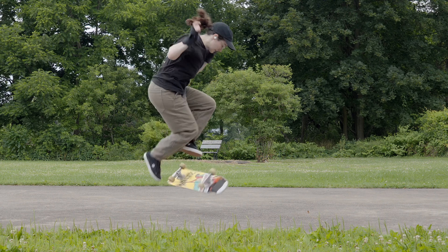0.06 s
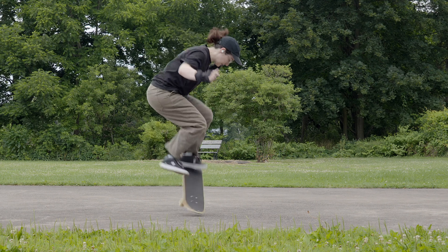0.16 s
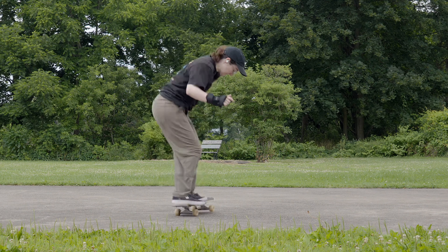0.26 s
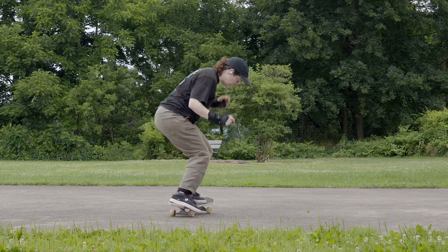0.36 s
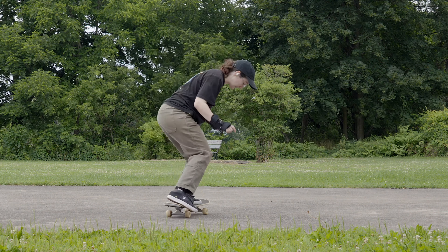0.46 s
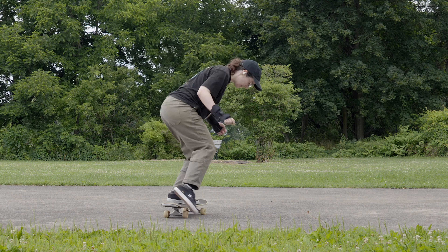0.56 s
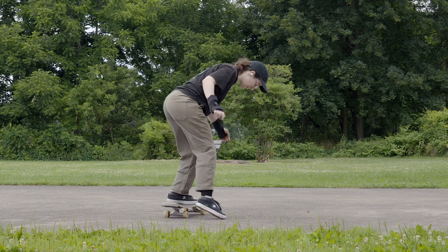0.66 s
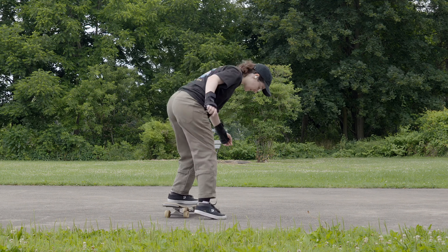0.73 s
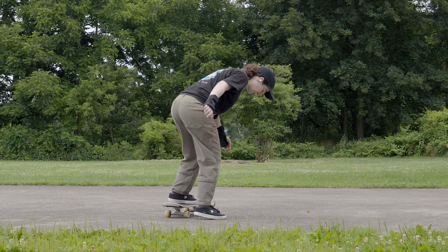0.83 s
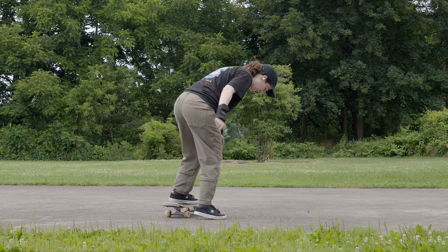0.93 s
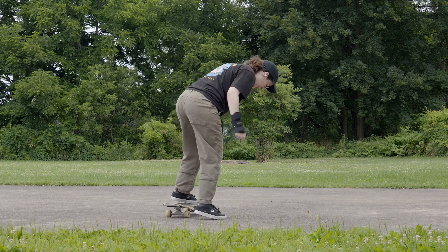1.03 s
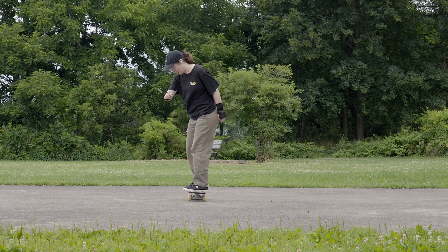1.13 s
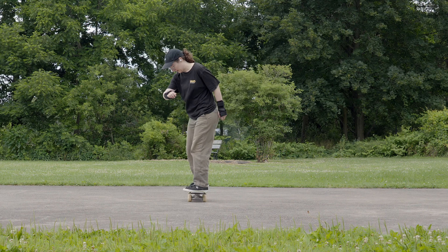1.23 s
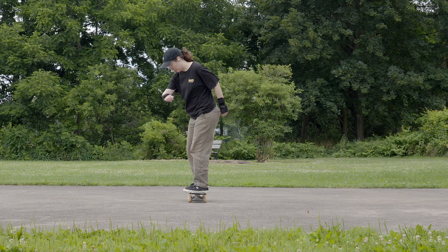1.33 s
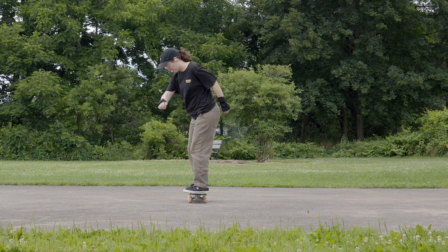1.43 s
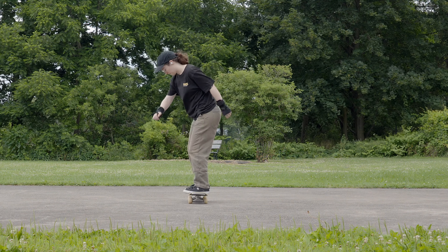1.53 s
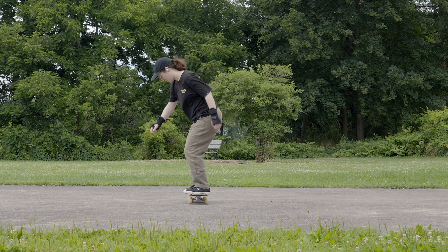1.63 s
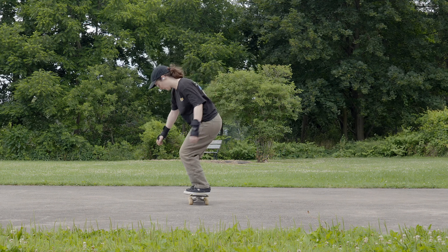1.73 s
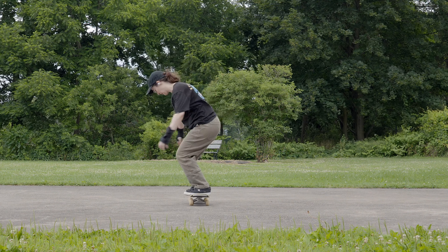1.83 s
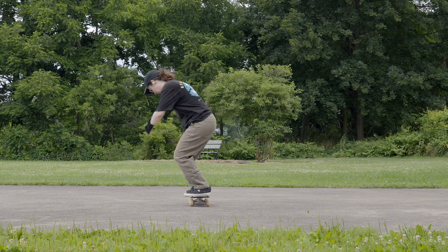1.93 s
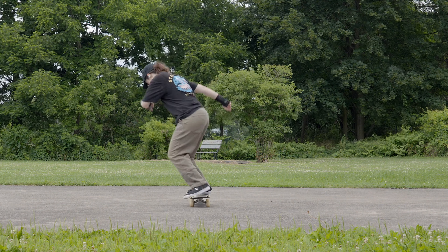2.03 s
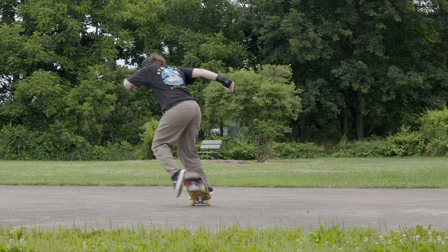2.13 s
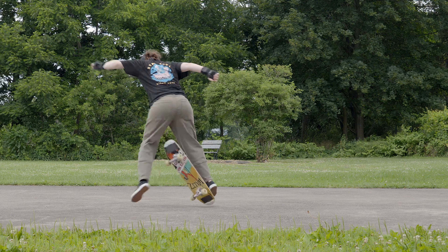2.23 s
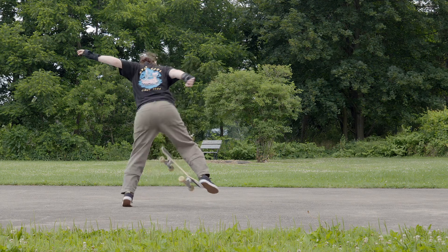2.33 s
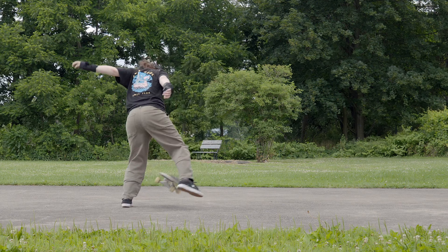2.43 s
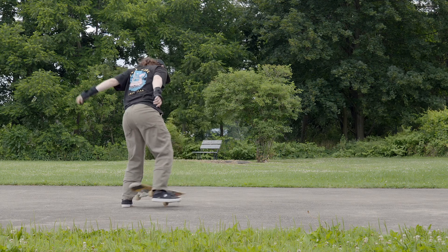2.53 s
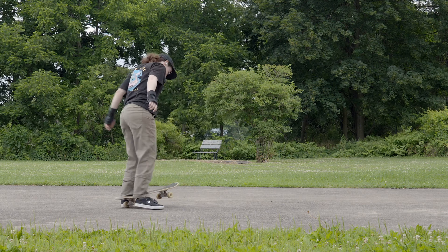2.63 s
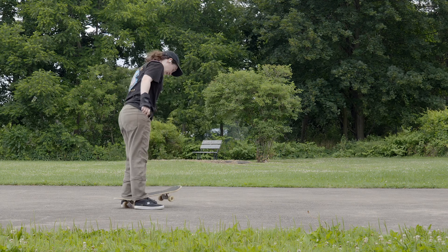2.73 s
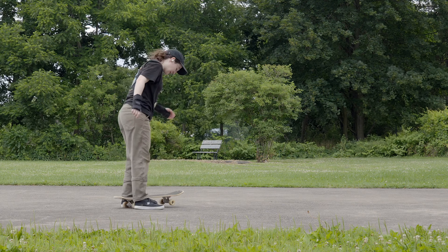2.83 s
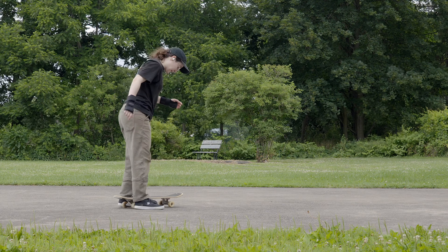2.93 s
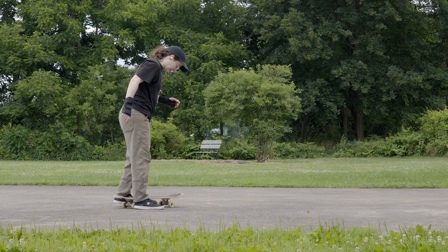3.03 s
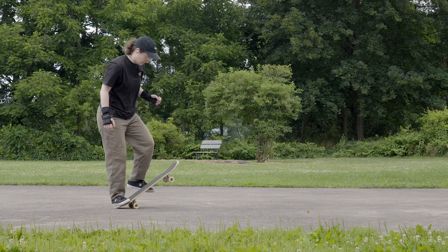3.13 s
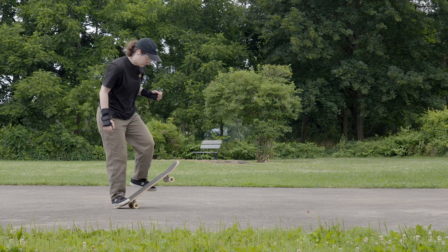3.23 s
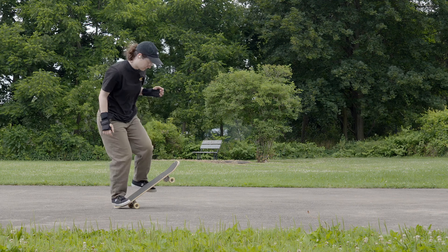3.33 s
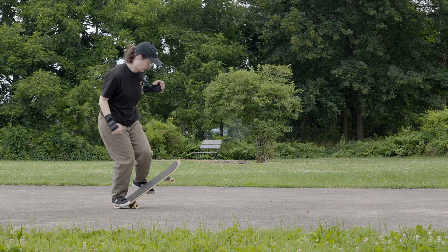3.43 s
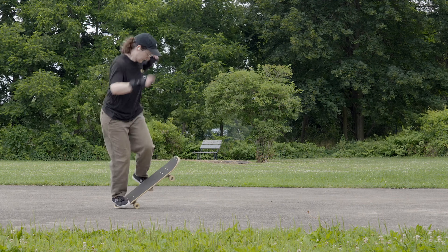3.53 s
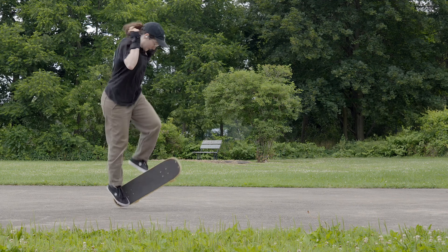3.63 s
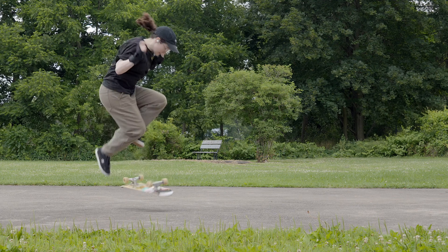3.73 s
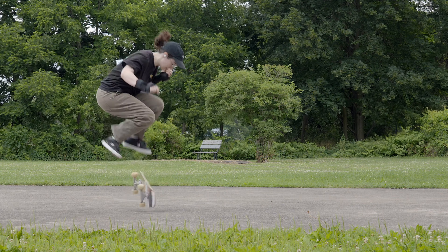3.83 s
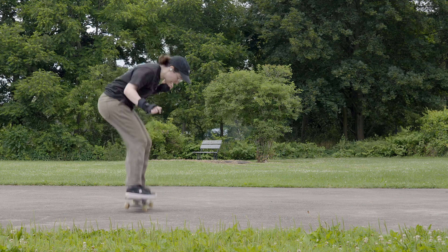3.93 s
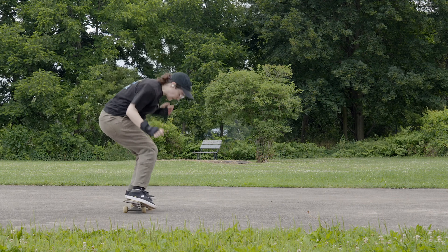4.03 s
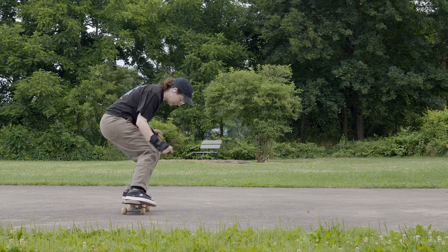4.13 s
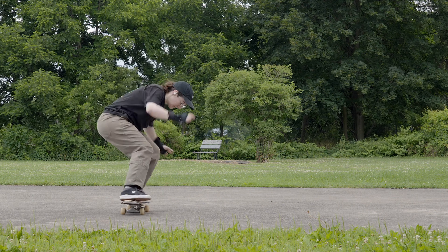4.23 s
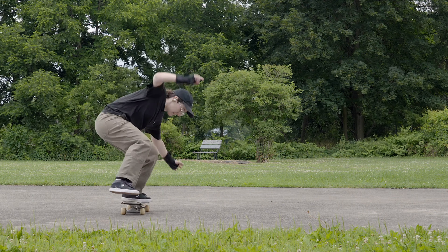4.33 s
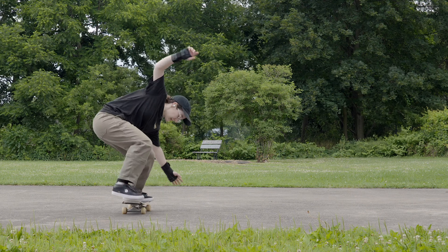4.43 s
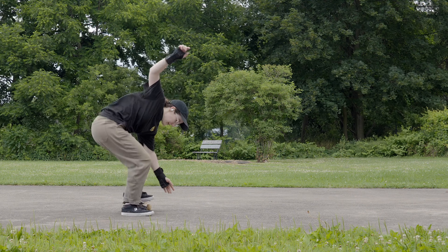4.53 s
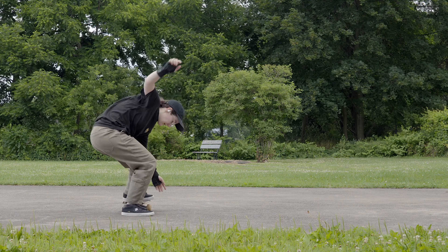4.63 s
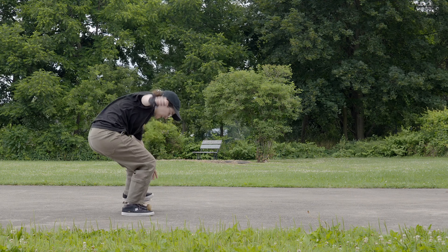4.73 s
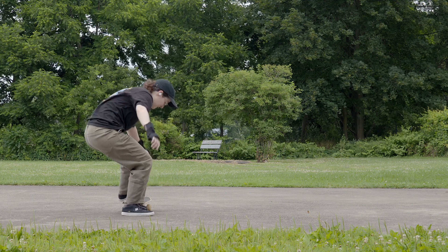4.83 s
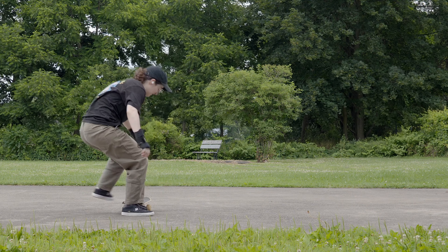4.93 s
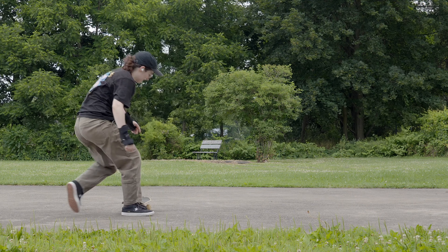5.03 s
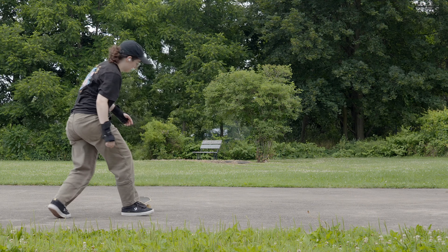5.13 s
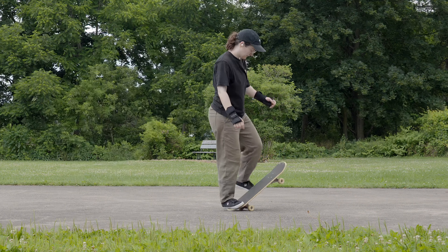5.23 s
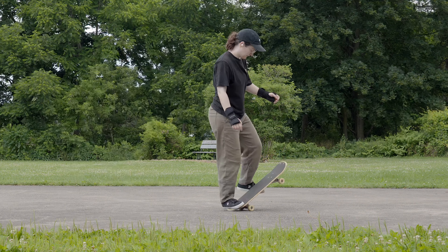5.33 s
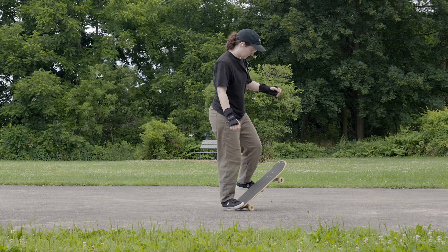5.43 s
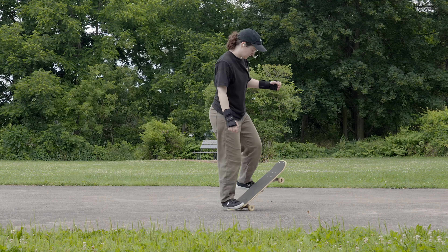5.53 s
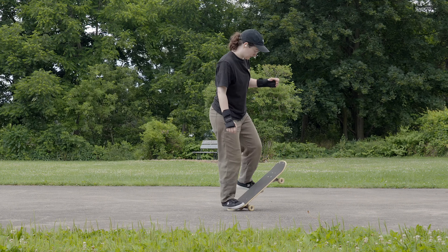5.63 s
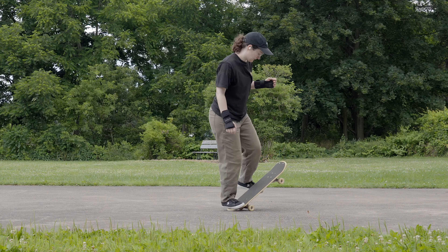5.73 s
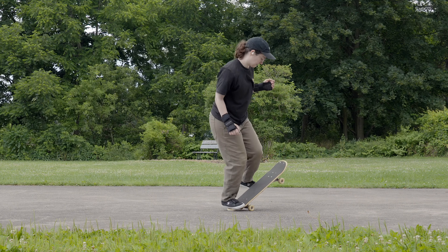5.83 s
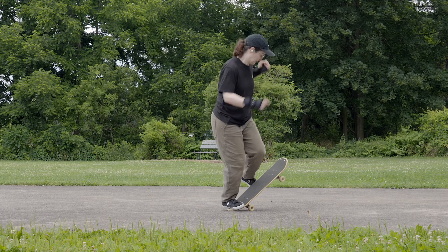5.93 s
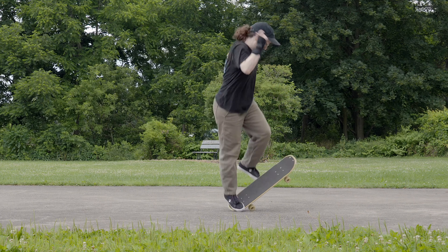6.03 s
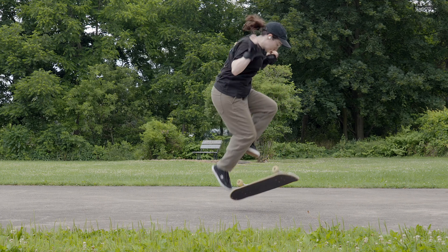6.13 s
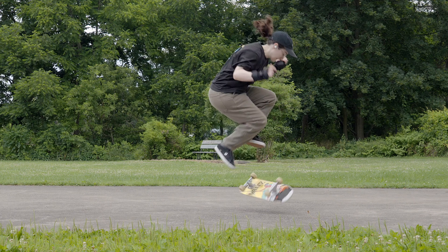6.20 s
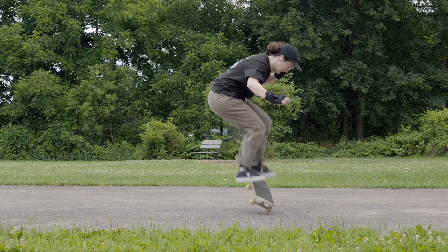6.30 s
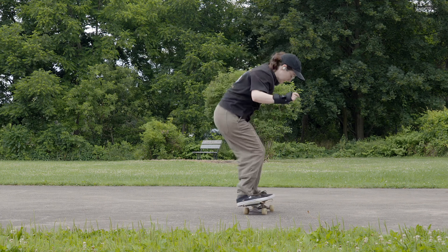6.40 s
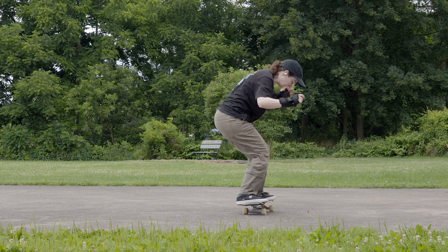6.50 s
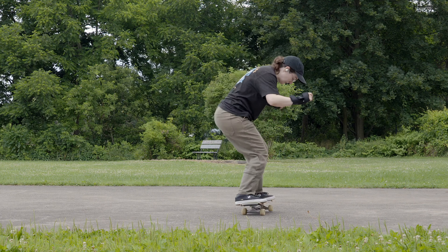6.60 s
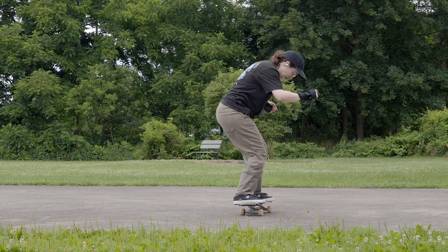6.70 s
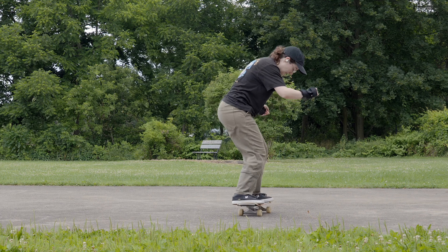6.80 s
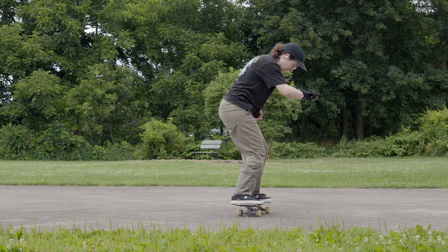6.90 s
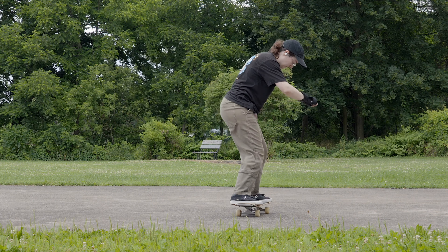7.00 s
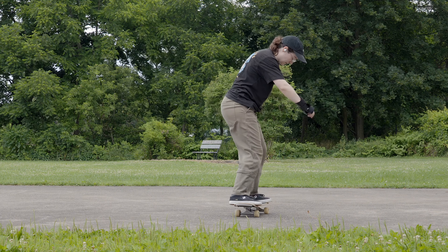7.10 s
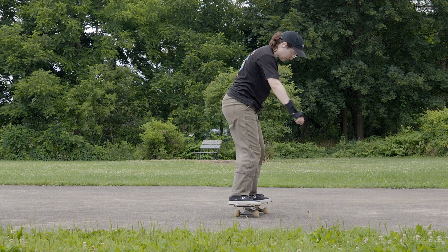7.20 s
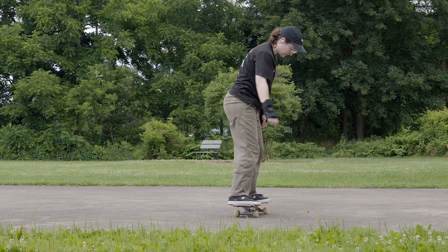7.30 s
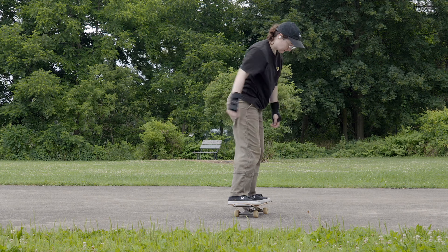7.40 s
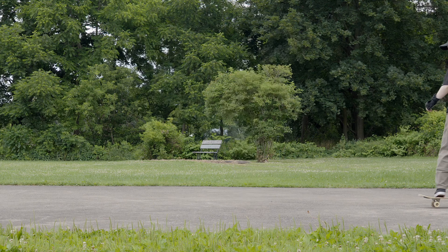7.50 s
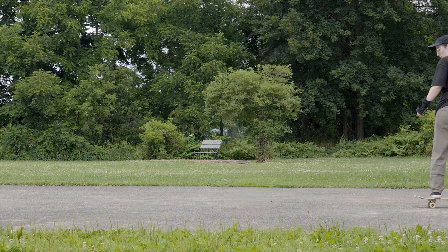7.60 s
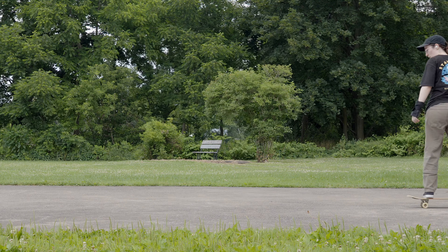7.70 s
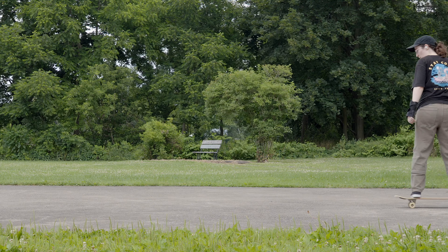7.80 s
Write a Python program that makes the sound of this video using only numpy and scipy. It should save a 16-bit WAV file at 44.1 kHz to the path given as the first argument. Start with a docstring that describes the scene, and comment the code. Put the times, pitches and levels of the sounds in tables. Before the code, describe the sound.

A skateboard is heard from some metres away on an asphalt park path. A light tap at the very start leads to a sharp clatter of deck and wheels around 0.3 seconds, then a short gritty roll that eases to a quiet coast. The board cracks again at 2.3 seconds, with looser knocks, soft shoe thuds and brief rolling between 2.6 and 3 seconds. A light pop at 3.7 seconds is followed by a loud clattering landing from 3.9 to 4.1 and a smaller knock at 4.6. After a lull, a sharp crack near 6.3 seconds runs into another hard landing at 6.5, with a low thud and a short roll. Two faint taps come around 7.6 seconds. Each knock echoes softly off the trees. Throughout, leaves hiss faintly over a dark wash of far traffic, while low engine drones come and go.

```python
"""Skateboard flip tricks in a park.

Some metres away the tail pops, then wheels, deck and shoes clatter onto an asphalt path.
Each blow rings the board, soles thud, and the wheels roll over the grain of the asphalt.
A wall of trees scatters each knock back as a soft echo.
Behind it leaves hiss, far traffic washes and distant engines drone."""
import sys
import numpy as np
from scipy import signal
from scipy.fft import rfft, irfft, next_fast_len
from scipy.io import wavfile

SR = 44100
rng = np.random.default_rng(int(sys.argv[2]) if len(sys.argv) > 2 else 0)


def to_wav(s):
    """Save 16-bit WAV."""
    ch = np.atleast_2d(s).T  # columns
    pcm = np.round(np.clip(ch, -1, 1) * 32767)  # PCM
    wavfile.write(sys.argv[1], SR, pcm.astype(np.int16))


N = 346626

# the four registers of a hit, thump, knock, crack and grit, lie between these: (edge [Hz])
REGISTER_EDGES = [205, 550, 1400, 3100, 16000]
# tone shared by all hits, thump to grit: (relative level [dB])
REGISTER_TONE = [0, 2, -0.5, -10.5]
# hits of tail, wheels and shoes: (time [s], clatter decay [s], level [dB],
# hardness [dB per register], struck spot's pitch [Hz], spot over the level [dB])
HITS = [(0.027, .015, -44.5, -1, 780, -8.5), (0.2456, 0.014, -32.5, 1.8, 590, -26),
        (0.2764, 0.0033, -38.5, -3.5, 1100, 5), (0.3029, 0.01, -29.5, -0.1, 255, -7.5),
        (0.3388, .0022, -26, 0, 880, 3.5), (0.348, 0.0044, -30, 5.5, 414, 8.5),
        (0.3521, 0.0044, -22, -2, 424, -5), (0.363, 0.0076, -29, 5, 1680, -4),
        (0.507, 0.0067, -42.5, 0.8, 410, -7), (2.2643, 0.0022, -34.5, -4.5, 2380, 10.5),
        (2.269, 0.0032, -34.5, 1, 1150, 2), (2.292, 0.0097, -34.5, 1.7, 633, 1),
        (2.5918, 0.012, -32, 0, 487, -16), (2.622, 0.0083, -35.5, 0.7, 287, -11),
        (2.6863, 0.0033, -33.5, 1, 1570, -6.5), (2.902, 0.0079, -38.5, 0.7, 1670, -14),
        (3.052, 0.014, -52, 4.5, 650, -6), (3.711, 0.0061, -43.5, -1.5, 2290, -11),
        (3.8841, .01, -25, -1, 1860, -10.5), (4.024, 0.0034, -36, -3, 2900, -3),
        (4.039, 0.0037, -39.5, -1.5, 1000, -1), (4.0491, 0.0046, -23.5, 0, 395, -2),
        (4.0545, 0.0016, -20.5, -4.5, 740, -1.5), (4.061, .0015, -28.5, -0.5, 590, -11),
        (4.098, .0023, -41.5, -10, 600, -5), (4.195, .007, -41, -3.5, 600, -12),
        (4.288, 0.0098, -52, -6, 730, 1), (4.6187, 0.0035, -39, -6.5, 943, -12),
        (6.347, 0.0088, -31, 3, 645, 3.5), (6.3501, 0.0045, -26, 2, 2000, 0),
        (6.4351, 0.0016, -28, 1.2, 1820, -9), (6.4407, 0.002, -32, 3.5, 1900, -18),
        (6.458, 0.0069, -30, -5.5, 440, -3), (6.465, 0.0056, -24.5, 1.5, 403, -9),
        (6.4714, 0.0096, -25.5, -1.2, 552, -7.5), (7.535, 0.029, -49, 2, 400, -5),
        (7.642, .005, -48, -1, 1670, -2.5)]
def knocks(level_samples=441):
    """Hits on asphalt, one track per register: harder is brighter. Levels are energy over 10 ms."""
    out = np.zeros((len(REGISTER_TONE), N + SR))
    for s, clatter_s, db, hardness_db, spot_hz, spot_db in HITS:
        hit, spot = contact(clatter_s, spot_hz)
        at = int(s * SR)
        shares = unit(from_db(REGISTER_TONE + hardness_db * np.arange(len(REGISTER_TONE))))
        for k, (low, high) in enumerate(zip(REGISTER_EDGES, REGISTER_EDGES[1:])):
            part = shares[k] * unit(band(hit, low, high))
            if low <= spot_hz < high:
                part = part + from_db(spot_db) * unit(band(spot, low, high))
            polarity = (-1) ** k   # neighbouring registers join in phase
            out[k, at:at + len(hit)] += polarity * from_db(db) * np.sqrt(level_samples) * part
    return out[:, :N]


def contact(clatter_s, spot_hz, brief_s=0.0021, ticks_per_s=6000, spread_db=4.5, top_hz=6500, size=6000):
    """A blow, then wood and wheels chatter on rough stone; gives the board's and the spot's ring."""
    t = np.arange(size) / SR
    ticks = (rng.random(size) < ticks_per_s / SR) * rng.choice([-1, 1], size)
    spray = ticks * from_db(spread_db * rng.standard_normal(size))
    attack = 1 - np.exp(-t / (0.077 * clatter_s))
    decay = np.exp(-(t / (1.57 * clatter_s)) ** 2)
    force = unit(spray * attack * decay)
    force[0] += 2 / (1 + (clatter_s / brief_s) ** 2)   # a brief contact is mostly one clean blow
    spot_t60 = .02 * (spot_hz / 500) ** -1.35   # high spots die sooner
    lowpass = signal.butter(2, top_hz, fs=SR, output="sos")
    return signal.sosfilt(lowpass, board(force)), ring(force, spot_hz, spot_t60)


# modes of deck and trucks: (pitch [Hz], level over the bare contact [dB])
BOARD_MODES = [(291, -4), (400, 2), (505, -4), (650, 0), (853, 1), (995, -1), (1175, 1), (1562, 0),
               (1730, -1), (2100, -1), (2510, -4), (3145, -12), (3877, -8), (4420, -7), (5005, -5),
               (5933, -5), (7575, -8)]
def board(force, t60=.024):
    """The force is heard directly and rings the modes, in a slightly new balance every time."""
    offsets_db = 0.42 * rng.standard_normal(len(BOARD_MODES))
    return force + sum(from_db(db + offset) * ring(force, hz, t60)
                       for (hz, db), offset in zip(BOARD_MODES, offsets_db))


# the rider's weight lands through the shoes: (time [s], level over 10 ms [dB])
FOOTFALLS = [(2.597, -62), (2.628, -48), (4.022, -46), (4.048, -42), (4.62, -44.5), (6.47, -36.5)]
def thuds(low_hz=75, high_hz=240, level_samples=441):
    """Rubber soles give a soft, low push."""
    out = np.zeros(N)
    push = unit(band(signal.unit_impulse(10 * level_samples), low_hz, high_hz))
    for s, db in FOOTFALLS:
        at = int(s * SR)
        out[at:at + len(push)] += from_db(db) * np.sqrt(level_samples) * push
    return out


def rolling(low_hz=260, high_hz=2500, bump_db=4.5, grains_per_s=3000):
    """Grains of asphalt tick under the wheels and shake the deck."""
    grains = (rng.random(N) < grains_per_s / SR) * rng.standard_normal(N)
    bumps = from_db(bump_db * drift(5.7))
    return wheel_load() * rms_one(band(board(grains * bumps), low_hz, high_hz))


# weight on the rolling wheels: (start [s], end [s], level at full load [dB])
WHEEL_RUNS = [(.35, 2.28, -45.5), (2.16, 3.5, -54), (2.66, 2.88, -48), (2.9, 3.02, -42.5),
              (4.04, 4.65, -48), (6.09, 6.4, -53), (6.45, 6.8, -43.5)]
def wheel_load(attack_s=0.098, release_s=0.12, settle_db_per_s=79.5, coast_db=-27.5):
    """The wheels take the rider's weight, ease to a quiet coast, then stop or leave the ground."""
    t, load = np.arange(N) / SR, 0
    for start, end, db in WHEEL_RUNS:
        age = np.maximum(t - start, 0)
        attack = np.minimum(age / attack_s, 1)
        pressed = from_db(-settle_db_per_s * np.maximum(age - attack_s, 0)) + from_db(coast_db)
        release = np.clip((end - t) / release_s, 0, 1)
        load = load + from_db(db) * attack * pressed * release
    return load


# send to the trees and the wood in each stretch: (gain [dB])
ECHO_SENDS = [1.5, -2.5, 2.5, -0.5, -8]
# returns, thump to grit: (tree line gain [dB], tree line t60 [s], deep wood gain [dB])
TREE_RETURNS = [(-24.5, 0.21, -23), (-19, 0.19, -27), (-15.5, 0.41, -20.5), (-6.5, 0.25, -18)]
def park_echo(registers, tree_delay_s=0.046):
    """The ground scatters at once, the trees later (leaves favour treble); the deep wood lingers."""
    out, send = 0, from_db(stepped(ECHO_SENDS))
    for part, (db, t60, wood_db) in zip(registers, TREE_RETURNS):
        ground = from_db(-11) * scatter(delay_s=.004, rise_s=0.0017, t60=0.16)
        trees = from_db(db) * scatter(tree_delay_s, rise_s=0.016, t60=t60)
        wood = from_db(wood_db) * scatter(tree_delay_s, rise_s=0.013, t60=1.7)
        out = out + signal.fftconvolve(part, ground)[:N]
        out = out + signal.fftconvolve(part * send, trees + wood)[:N]
    return out


def scatter(delay_s, rise_s, t60):
    """Many small reflectors: a tail that swells after a pre-delay and dies away."""
    t = np.maximum(np.arange(SR) / SR - delay_s, 0)
    swell = 1 - np.exp(-(t / rise_s) ** 2)
    return unit(rng.standard_normal(SR) * swell * from_db(-60 * t / t60))


# traffic bed in each stretch: (level [dB])
TRAFFIC_LEVELS = [-54.5, -56, -57.5, -55.5, -58.5]
# its tone: (frequency [Hz], relative level [dB])
TRAFFIC_TONE = [(20, -3), (50, -0.5), (120, 4), (250, 1), (480, -2), (900, -1.5), (1400, -5), (2200, -14.5),
                (4000, -33), (16000, -60)]
def traffic(sway_db=0.43):
    """Far traffic: a dark wash that sways slightly."""
    return from_db(stepped(TRAFFIC_LEVELS) + sway_db * drift(3.2)) * coloured(TRAFFIC_TONE)


# leaf bed in each stretch: (level [dB])
LEAF_LEVELS = [-62, -57.5, -59, -60.5, -64]
# its tone: (frequency [Hz], relative level [dB])
LEAF_TONE = [(20, -58), (800, 7), (1600, 3), (2500, 2), (5000, -2), (7500, -7.5), (10000, -12.5),
             (13000, -18.5), (16000, -18)]
def leaves(sway_db=0.43):
    """Leaves: an airy hiss that sways slightly."""
    return from_db(stepped(LEAF_LEVELS) + sway_db * drift(1.6)) * coloured(LEAF_TONE)


# distant engines: (start [s], end [s], pitch [Hz], bandwidth [Hz], level [dB])
ENGINE_DRONES = [(0, 1.142, 75.6, 24, -60), (0.49, 1.13, 145.7, 23, -63.5), (0.496, 1.13, 213.4, 31, -60),
                 (1.696, 3.125, 46, 4.2, -61.5), (3.245, 4.13, 63, 29, -62.5),
                 (5.296, 7.5, 109.7, 12, -61.5), (5.345, 7.494, 158, 120, -61)]
def engines(fade_s=0.0044):
    """Engines far off: narrow, wavering drones that come and go."""
    t, out = np.arange(N) / SR, 0
    for start, end, centre_hz, width_hz, db in ENGINE_DRONES:
        gate = np.clip(np.minimum(t - start, end - t) / fade_s, 0, 1)
        drone = noise(lambda hz: 1 / (1 + ((hz - centre_hz) / (width_hz / 2)) ** 2))
        out = out + from_db(db) * gate * drone
    return out


# five stretches, each with its own echo send and bed levels: (start [s])
STRETCH_CUES = [0, 1.135, 3.1, 5.27, 7.51]
def stepped(levels):
    """Hold each level from its cue to the next."""
    stretch = np.searchsorted(STRETCH_CUES, np.arange(N) / SR, "right") - 1
    return np.array(levels)[stretch]


def ring(force, hz, t60):
    """One damped mode driven by a force; gain 1 at its peak."""
    r, w = from_db(-60 / (t60 * SR)), 2 * np.pi * hz / SR
    return signal.lfilter([1, 0, -1], [1, -2 * r * np.cos(w), r * r], force + 1e-18) * (1 - r * r) / 2


def band(x, low_hz, high_hz):
    """Gentle band-pass."""
    return signal.sosfilt(signal.butter(2, [low_hz, high_hz], "band", fs=SR, output="sos"), x)


def noise(gain_at):
    """Noise of rms 1, shaped by a function of frequency."""
    size = next_fast_len(N, True)
    hz = np.maximum(np.fft.rfftfreq(size, 1 / SR), 1e-3)
    return rms_one(irfft(rfft(rng.standard_normal(size)) * gain_at(hz), size)[:N])


def coloured(tone):
    """Noise through an EQ curve of (frequency [Hz], level [dB]) points."""
    points_hz, db = np.transpose(tone)
    return noise(lambda hz: from_db(np.interp(np.log(hz), np.log(points_hz), db)) * (hz > 15))


def drift(rate_hz):
    """Slow random wander of rms 1."""
    return noise(lambda hz: 1 / (1 + (hz / rate_hz) ** 2))


def from_db(db):
    """Decibels to gain."""
    return 10 ** (np.asarray(db) / 20)


def rms_one(x):
    """Scale to rms 1."""
    return x / np.sqrt(np.mean(x ** 2) + 1e-20)


def unit(x):
    """Scale to energy 1."""
    return x / np.sqrt(np.sum(x ** 2) + 1e-20)


def scene():
    """Mono mix of the board, its echo and the park's ambience."""
    registers = knocks()
    skateboard = registers.sum(axis=0) + thuds() + park_echo(registers) + rolling()
    return (skateboard + traffic() + leaves() + engines())[None]


def record(dry, cutoff_hz=15900):
    """A steep high cut on the mix."""
    return signal.sosfilt(signal.ellip(10, .1, 70, cutoff_hz, fs=SR, output="sos"), dry)


dry = scene()
out = record(dry)
to_wav(out)
```